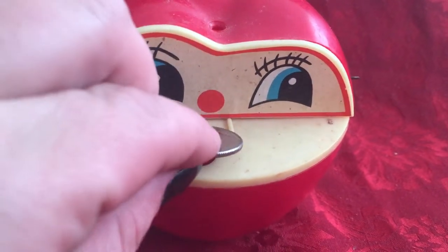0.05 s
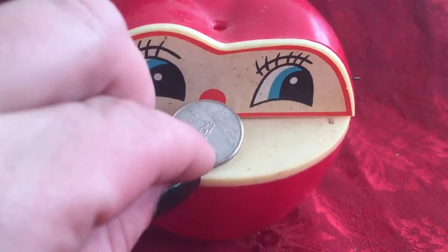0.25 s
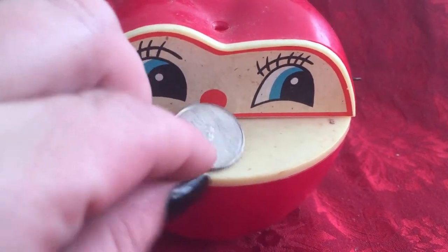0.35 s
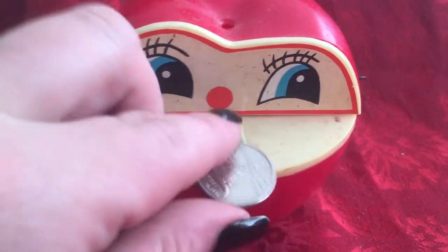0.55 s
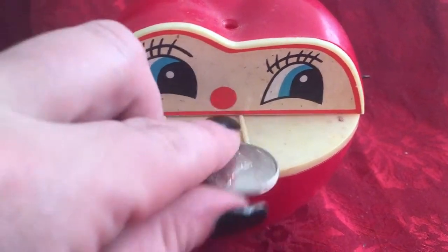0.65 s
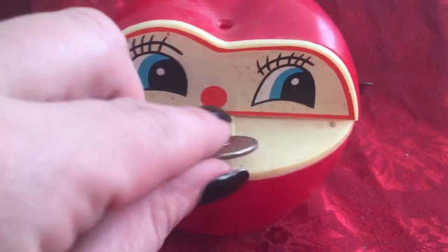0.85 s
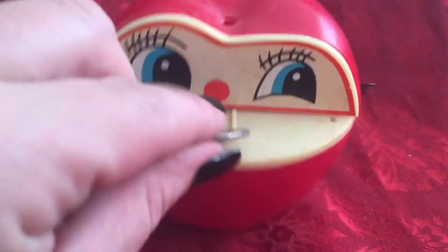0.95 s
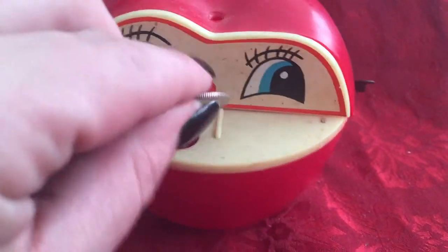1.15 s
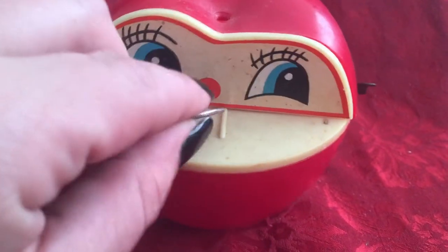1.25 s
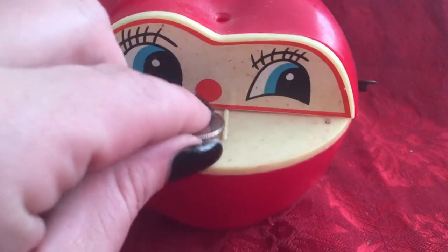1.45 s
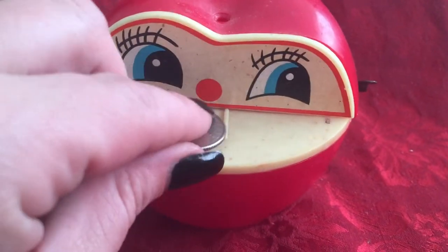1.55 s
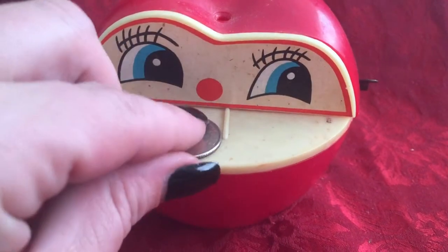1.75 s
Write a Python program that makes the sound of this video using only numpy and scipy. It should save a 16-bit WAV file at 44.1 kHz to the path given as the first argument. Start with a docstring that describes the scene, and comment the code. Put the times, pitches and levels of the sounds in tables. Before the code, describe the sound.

A coin clacks, scrapes and clatters against a hollow plastic coin bank, then taps lightly.

```python
"""A hand works a coin against the mouth of a hollow plastic coin bank, close up in a small room.
First comes one hard clack that sets the shell ringing and rebounds twice. The coin then scrapes
along the lip, sticking and slipping, into a clatter, and ends with light taps and rubs at the slot.
Every contact sounds through the same plastic shell; late on, the coin itself rings faintly.
Underneath lie soft low thuds, a few short low notes and a steady room tone."""
import sys
import numpy as np
from scipy import signal
from scipy.fft import rfft, irfft
from scipy.io import wavfile
from scipy.ndimage import uniform_filter1d

SR = 44100
rng = np.random.default_rng(int(sys.argv[2]) if len(sys.argv) > 2 else 0)


def digitize_waveform(pressure):
    """Quantize a signal to 16-bit integers and store it at the path in sys.argv[1].

    Rows of a 2-D input are taken as channels; values are limited to [-1, 1].
    """
    field = np.atleast_2d(pressure).T
    bounded = np.clip(field, -1, 1)
    quanta = np.round(bounded * 32767).astype(np.int16)
    wavfile.write(sys.argv[1], SR, quanta)


N = 79380


def amp(db):
    """Decibels to gain."""
    return 10 ** (np.asarray(db) / 20)


def read(points, hz):
    """Reads a curve along a log-frequency axis."""
    freqs, values = np.transpose(points)
    return np.interp(np.log(hz + 1), np.log(freqs), values)


def add(mix, s, sound):
    """Mixes a sound in at s seconds."""
    part = mix[max(round(s * SR), 0):][:len(sound)]
    part += sound[:len(part)]


def room_tone(level_db=-68.5):
    """A steady bed of low rumble under a faint hiss."""
    # spectrum of the bed: (frequency [Hz], relative level [dB])
    spectrum = [(20, -25.5), (55, -9), (85, -0.5), (115, -1.5), (160, -8), (300, -14.5), (700, -23.5),
                (1500, -23), (4000, -27), (9000, -31.5), (15000, -37)]
    gain = amp(read(spectrum, np.fft.rfftfreq(N, 1 / SR)))
    bed = irfft(rfft(rng.standard_normal(N)) * gain, N)
    return amp(level_db) * bed / bed.std()


def room_reverb(dry, wet_db=-18.5, predelay_s=0.008):
    """The small room's short diffuse tail, whose treble is weak and dies first."""
    # decay of the room: (frequency [Hz], t60 [s])
    decay_times = [(300, .36), (800, 0.27), (3000, 0.19), (8000, 0.18), (15000, 0.13)]
    hz, t, noise = signal.stft(rng.standard_normal(SR // 2), SR, nperseg=256)
    cloth_db = read([(6000, 0), (14000, -5.5)], hz)[:, None]  # cloth soaks up the highest treble
    decay_db = -60 * t / read(decay_times, hz)[:, None]
    tail = signal.istft(noise * amp(cloth_db + decay_db), SR)[1]
    out = np.zeros(N)
    add(out, predelay_s, signal.fftconvolve(dry, tail / np.linalg.norm(tail)))
    return amp(wet_db) * out


def thuds_and_low_notes(length_s=0.041):
    """Soft low thuds, and a few short low notes that sound with the coin's rubs and taps."""
    # thuds below 100 Hz, low notes around 300 Hz: (time [s], pitch [Hz], level [dB])
    pulses = [(0.205, 93, -52.5), (0.351, 81, -58), (.6, 304.5, -48), (0.851, 90, -58), (0.954, 89.5, -58),
              (1.107, 91, -57.5), (1.184, 87.7, -60), (1.301, 267, -56.5), (1.305, 82, -54.5),
              (1.385, 90.8, -60), (1.444, 86, -57), (1.575, 88, -54.5), (1.76, 319, -56)]
    out, t = np.zeros(N), np.arange(0, length_s, 1 / SR)
    swell = np.sin(np.pi * t / length_s) ** 2
    for s, hz, db in pulses:
        add(out, s, amp(db) * swell * np.sin(2 * np.pi * hz * t))
    return out


def pings(attack_s=0.0031):
    """Single modes that sing out after a contact, damped by the fingers."""
    # low notes from the shell, high ones from the coin: (time [s], pitch [Hz], level [dB], t60 [s])
    notes = [(.932, 864, -44, 0.12), (.982, 913, -40, 0.073), (1.113, 790, -35, 0.1),
             (1.129, 1760, -40.5, 0.082), (1.125, 569.3, -48, 0.2), (1.383, 782, -43, 0.068),
             (1.619, 12500, -40, 0.0093), (1.63, 587, -44.5, 0.064)]
    out, t = np.zeros(N), np.arange(SR // 2) / SR
    for s, hz, db, t60 in notes:
        envelope = np.minimum(t / attack_s, 1) * amp(db - 60 * t / t60)
        add(out, s, envelope * np.sin(2 * np.pi * hz * t))
    return out


def shell_resonance(contacts, echo_s=0.001339, echo_gain=0.12):
    """The cavity throws each contact back once, and the shell's stronger modes ring on."""
    # resonances of shell and cavity: (frequency [Hz], peak gain [dB], t60 [s])
    modes = [(365, -5.5, 0.3), (585, -1, 0.16), (787.5, 1.5, 0.077), (1153, -10.5, 0.044),
             (1647, 6.5, 0.043), (2260, -4, 0.17), (2246, -5.5, 0.056), (2730, 0.5, 0.044),
             (2925, 2.5, 0.059), (3725, -6, 0.06), (4400, -4, 0.13), (3818, 1.5, 0.027), (4465, 3, 0.036),
             (5480, 1, 0.039), (6230, -4, 0.04), (7230, -2.5, 0.022), (8690, -3, 0.011),
             (9500, -5.5, 0.026)]
    t = np.arange(SR // 4) / SR
    response = signal.unit_impulse(len(t)) + echo_gain * np.sinc((t - echo_s) * SR)
    for hz, db, t60 in modes:
        decay = amp(-60 * t / t60)
        response += 2 * amp(db) * decay / decay.sum() * np.cos(2 * np.pi * hz * t)
    return signal.fftconvolve(contacts, response)[:N]


def contact_eq(x, knock_db, edge_db, fizz_db, low_hz, low_db, high_hz, high_db, size=4096):
    """The shell's colour at one touch: hollow knock, bright edge, top fizz and two favoured notes."""
    # broad colour of the shell: (frequency [Hz], gain [dB])
    body_eq = [(60, -41), (190, -33), (270, -16.5), (380, -3.5), (600, -2.5), (800, -5), (1050, -6),
               (1400, -8.5), (1950, -8), (2900, -4), (3300, -5.5), (5500, -5), (8000, -10), (11000, -9.5),
               (15000, -15)]
    touch_eq = [(250, 0.0052), (520, knock_db), (950, knock_db), (1500, 0.12 * knock_db), (2900, 0.0003),
                (5500, edge_db), (7000, edge_db), (9500, fizz_db), (15000, 1.3 * fizz_db)]
    hz = np.fft.rfftfreq(size, 1 / SR)
    gain = amp(read(body_eq, hz) + read(touch_eq, hz))
    for note_hz, lift_db, width_hz in [(low_hz, low_db, 50), (high_hz, high_db, 0.035 * high_hz)]:
        detune = 2 * (hz - note_hz) / width_hz
        gain *= np.sqrt(1 + (amp(lift_db) ** 2 - 1) / (1 + detune ** 2))
    log_gain = np.log(np.concatenate([gain, gain[-2:0:-1]]))
    minimum_phase = np.exp(np.conj(signal.hilbert(log_gain)))  # nothing rings ahead of the hit
    return signal.fftconvolve(x, np.fft.ifft(minimum_phase).real)


def plastic_ring(t60, attack_s=0.0008, hold_s=0.002, size=4096):
    """The dense, quickly damped modes of plastic after one contact, as a noise burst of energy 1."""
    t = np.arange(size) / SR
    envelope = np.minimum(t / attack_s, 1) * amp(-60 * np.maximum(t - hold_s, 0) / t60)
    burst = rng.standard_normal(size) * envelope
    for _ in range(6):  # by turns, flatten the spectrum and restore the envelope
        spectrum = rfft(burst)
        band_power = abs(uniform_filter1d(abs(spectrum) ** 2, size=20))
        burst = irfft(spectrum / np.sqrt(band_power + 1e-20))
        running_power = abs(uniform_filter1d(burst ** 2, size=70))
        burst *= envelope / np.sqrt(running_power + 1e-16)
    return burst / np.linalg.norm(burst)


def stick_slip(size, slips_per_s=1300, spread_db=3.5, t60=0.02, spots=4):
    """The coin's edge catches and lets go: a grain of tiny random contacts at a few spots, rms 1."""
    grain = np.zeros(size)
    for _ in range(spots):
        chance, strength, polarity = rng.random((3, size))
        slip_db = spread_db * np.minimum(-np.log(1 - strength), 3)
        slipping = chance < slips_per_s / spots / SR
        impulses = amp(slip_db) * np.sign(polarity - 0.5) * slipping
        grain += signal.fftconvolve(impulses, plastic_ring(t60))[:size]
    return grain / (grain.std() + 1e-12)


def rubs(attack_s=0.0029, release_s=0.0044, size=8000):
    """Short strokes of friction as the coin rubs on the plastic."""
    # strokes and their tone: (start [s], length [s], drive [dB], knock [dB], edge [dB], fizz [dB],
    # low note [Hz], its lift [dB], high note [Hz], its lift [dB])
    strokes = [(0.061, 0.0099, -63, 15, -7, -19, 583, 5, 2510, 22.5),
               (0.191, 0.019, -45.5, 11, 3, -2, 714, 4, 2840, 7),
               (0.333, 0.063, -59.5, 14.5, -1.5, -16, 1320, 13, 9230, 18),
               (0.44, 0.04, -56, 7.5, -14.5, -30.5, 1135, 19.5, 1710, 13.5),
               (0.518, 0.018, -41.5, -5, -9, -16.5, 1670, 19, 2880, 22),
               (0.812, 0.072, -50, 5.5, 1, -7.5, 920, 16, 1895, 22),
               (0.909, 0.034, -46.5, 4.5, -3.5, -9.5, 853, 16.5, 2270, 10.5),
               (0.949, 0.052, -52.5, 10.5, -4, -9.5, 900, 9, 2480, 15),
               (1.022, 0.037, -49.5, 8.5, -5, -9, 790, 3, 2000, 18.5),
               (1.086, 0.046, -43.5, 9.5, 2.5, -12.5, 784, 8, 1770, 16.5),
               (1.152, 0.075, -70, 11, -12, -8, 573, 2, 1750, 1),
               (1.274, 0.081, -45.5, 6, -17.5, -8.5, 1144, 8.5, 4670, 4),
               (1.379, 0.057, -46.5, 11, -4, -10, 749, 8.5, 3200, 10.5),
               (1.452, 0.069, -60.5, 14, -3.5, -10, 560, 6.5, 3434, 9),
               (1.609, 0.03, -43.5, 6.5, -10.5, -13.5, 608, 6, 1730, 12),
               (1.637, 0.025, -55, 10.5, -12.5, -15, 631, 9.5, 3820, 17.5),
               (1.759, 0.024, -61, 7.5, 9, 1.5, 322, 4, 1806, 25)]
    out, t = np.zeros(N), np.arange(size) / SR
    for s, length_s, db, *tone in strokes:
        envelope = np.minimum(t / attack_s, 1) * np.exp(-np.maximum(t - length_s, 0) / release_s)
        add(out, s, amp(db) * contact_eq(stick_slip(size) * envelope, *tone))
    return out


def scrape():
    """The coin drags along the lip, pressing harder until it slips off."""
    # swell of the friction: (time [s], drive [dB])
    swell = [(.425, -59), (0.476, -49.5), (0.488, -34.5), (0.524, -33.5), (0.547, -29.5), (.558, -31.5),
             (.574, -29), (.59, -34.5), (0.612, -28), (.65, -36.5), (0.686, -26), (0.702, -36), (.715, -51)]
    # tone of the lip: (knock [dB], edge [dB], fizz [dB],
    # low note [Hz], its lift [dB], high note [Hz], its lift [dB])
    tone = (-1.5, -8, -16.5, 1291, 9, 3308, 7.5)
    s, db = np.transpose(swell)
    envelope = amp(np.interp(np.arange(N) / SR, s, db, left=-120, right=-120))
    return contact_eq(stick_slip(N) * envelope, *tone)[:N]


def clicks():
    """Hard contacts: the snap of the clack with its rebounds, the clatter and the light taps."""
    # hits of coin and mechanism on the shell: (time [s], drive [dB], knock [dB], edge [dB], fizz [dB],
    # t60 [s], low note [Hz], its lift [dB], high note [Hz], its lift [dB])
    hits = [(0.167, -25, 9.5, -7, -10, 0.11, 1020, 15.5, 2200, 7),
            (0.2044, -5, -8, 0, -9, 0.051, 1420, 14, 3000, 0),
            (0.218, 12, 5.5, 6.5, 4, 0.024, 1373, 7.5, 8450, 4),
            (0.2305, 6.5, -5, 0, -1, 0.014, 1320, 9, 3390, 11.5),
            (0.247, 8.5, -5, -2, -3.5, 0.027, 1430, 8, 2210, 6.5),
            (0.3429, -22.5, 6, 0, -12, 0.021, 1394, 21.5, 2730, -8.5),
            (0.491, -3, -21, -16, -22.5, 0.055, 750, 11, 3037, 12.5),
            (0.5055, -5.5, 0.5, -2.5, -14, 0.061, 825, 20.5, 1694, 19),
            (0.6177, -6, 4, 0, -15, 0.017, 578, 14, 2320, 15),
            (0.632, -3, 9.5, 2, -11, 0.032, 1580, 4, 2990, 13),
            (0.645, 3, 0.5, 1, -4.5, 0.037, 1370, 17, 3670, 8.5),
            (0.655, 2, -1.5, -6, -7, 0.027, 1250, 13.5, 3280, 19.5),
            (0.659, 8, -2, 1, -3.5, 0.038, 1234, 17, 4520, 6),
            (0.67, 8.5, 0.5, 3.5, -2, 0.029, 1270, 15.5, 3890, 7.5),
            (0.6733, 1, -8.5, 0, 0, 0.017, 1715, 18, 5470, 2),
            (.683, 2, -6, 0.5, -8.5, 0.064, 600, 4, 2967, 14.5),
            (0.6944, -2.5, -21, 1, -4, 0.033, 1340, 6, 7350, 9.5),
            (0.7682, -2.5, 1, -11, -15.5, 0.023, 753, 4, 2200, 6),
            (0.8025, -8.5, 9, -0.5, -6, 0.067, 957, 12, 1860, 19),
            (0.846, -0.5, 1, -8.5, -21, 0.04, 987, 16.5, 1990, 10.5),
            (0.8564, -10, 6.5, -4, -15, 0.038, 896, 12, 2206, 19),
            (0.864, -22.5, -13, 11, 4.5, 0.025, 384, 36.5, 2150, -9),
            (0.958, -23.5, 8.5, 0, -26, 0.035, 890, 18.5, 2130, 16),
            (0.981, -15.5, 5, -7, -43, 0.013, 874, 10, 2430, 15),
            (1.012, -6, -16.5, 0, -9, 0.033, 790, 13, 8800, 6.5),
            (1.0694, -6, -4, -9.5, -7.5, 0.036, 1694, 8, 5870, 15.5),
            (1.0981, -10.5, 3.5, -29, -16, 0.024, 1033, 18, 2940, 5),
            (1.112, -18, 10, -7, -14, 0.029, 1110, 19.5, 4400, -2),
            (1.123, -7, -3, -11, -25, 0.064, 805, 14, 2860, 9),
            (1.2788, -19, -12, 8, -6.5, 0.035, 1440, 16, 4300, 11),
            (1.295, -17.5, -5, 7.5, -14.5, 0.048, 1470, 18, 2564, 17.5),
            (1.31, -7.5, -8, -6, -2.5, 0.039, 1120, 6, 6100, 17.5),
            (1.3187, -6.5, 3, 0, -1, 0.028, 480, -2, 4380, 8.5),
            (1.3824, -11.5, 12, -3, -12.5, 0.065, 752, 7.5, 3190, 19),
            (1.412, -16.5, 0, -6, -8, 0.02, 780, 6, 4800, 16),
            (1.526, -13, 0.5, -4.5, -11.5, 0.023, 1537, 8, 3390, 13)]
    out = np.zeros(N)
    for s, db, knock_db, edge_db, fizz_db, t60, *notes in hits:
        add(out, s, amp(db) * contact_eq(plastic_ring(t60), knock_db, edge_db, fizz_db, *notes))
    return out


def clack(start_s=0.2186, attack_s=0.00087):
    """The one hard blow sets the whole hollow shell ringing for a moment."""
    # shell modes struck all at once: (frequency [Hz], level [dB], t60 [s])
    modes = [(630, -19, 0.046), (762, -19.5, .04), (1267, -18.5, 0.031), (2680, -20.5, .032),
             (2907, -10.5, .036), (3580, -17.5, 0.033), (4410, -23.5, .03), (5240, -19, .032),
             (5370, -22.5, .04), (6180, -20, 0.033)]
    out, t = np.zeros(N), np.arange(SR // 8) / SR
    for hz, db, t60 in modes:
        envelope = np.minimum(t / attack_s, 1) * amp(db - 60 * t / t60)
        add(out, start_s, envelope * np.sin(2 * np.pi * (hz * t + rng.random())))
    low_cut = signal.butter(2, 450, "highpass", fs=SR, output="sos")  # a small shell has little bass
    return signal.sosfilt(low_cut, out)


def scene():
    """The bank and the coin in their room, in mono."""
    bank = shell_resonance(clicks() + rubs() + scrape()) + clack() + pings()
    return (bank + room_reverb(bank) + thuds_and_low_notes() + room_tone())[None]


def record(dry):
    """A steep high cut at 15.5 kHz on the whole mix."""
    lowpass = signal.firwin(255, 15500, window=("kaiser", 8), fs=SR)
    return signal.oaconvolve(dry, lowpass[None], "same")


dry = scene()
out = record(dry)
digitize_waveform(out)
```